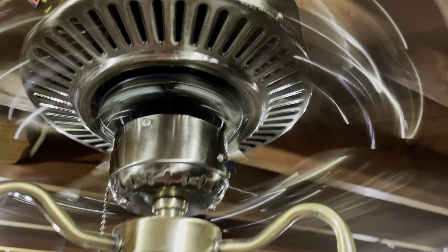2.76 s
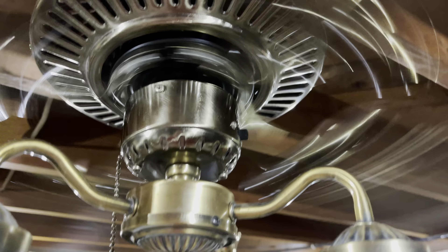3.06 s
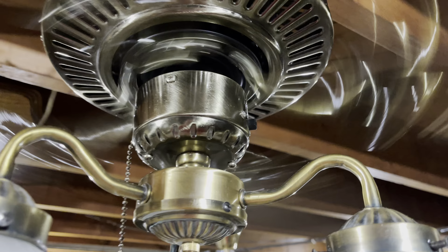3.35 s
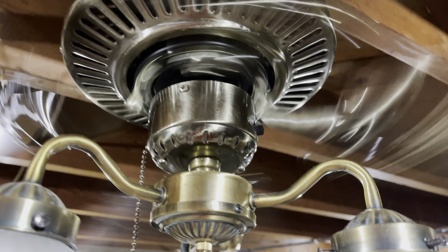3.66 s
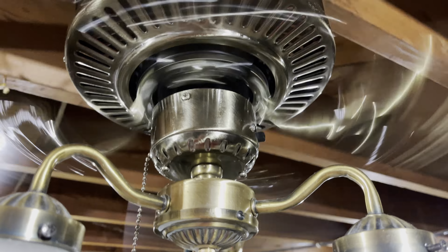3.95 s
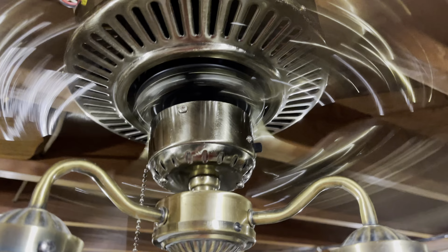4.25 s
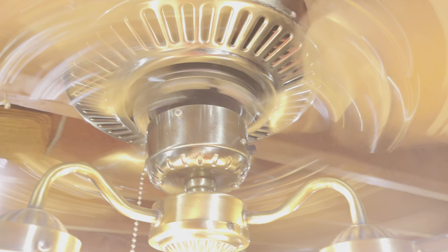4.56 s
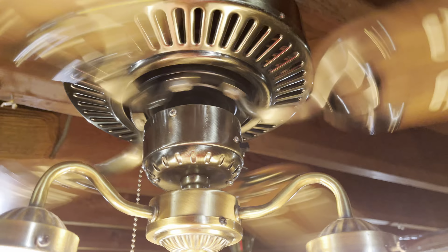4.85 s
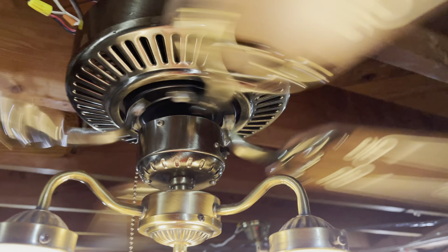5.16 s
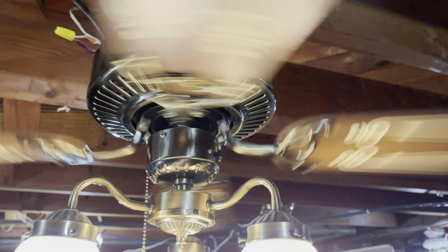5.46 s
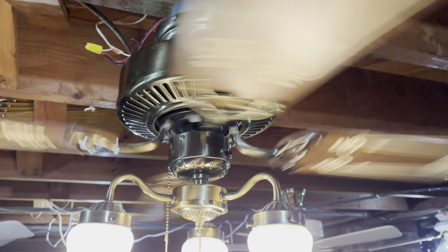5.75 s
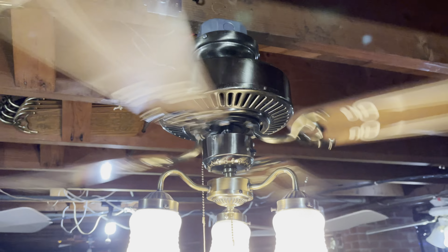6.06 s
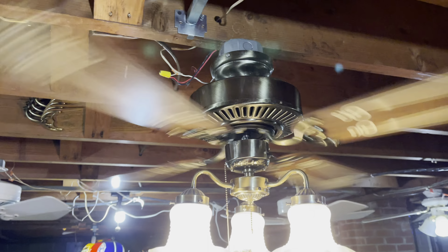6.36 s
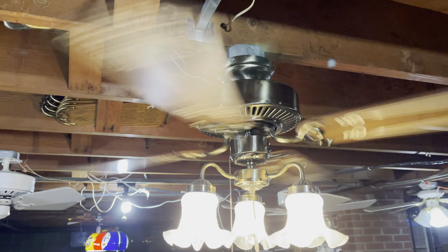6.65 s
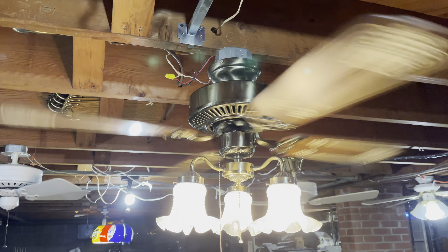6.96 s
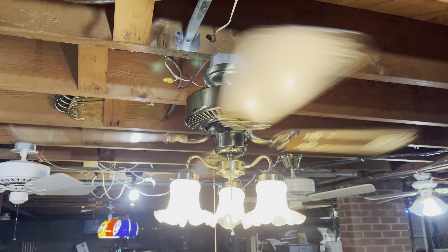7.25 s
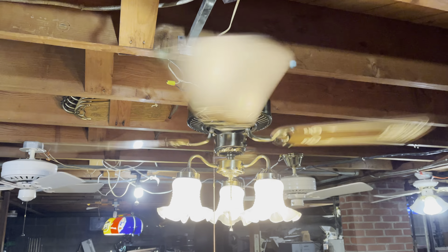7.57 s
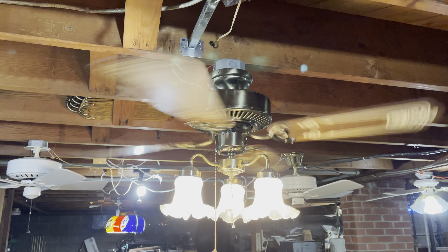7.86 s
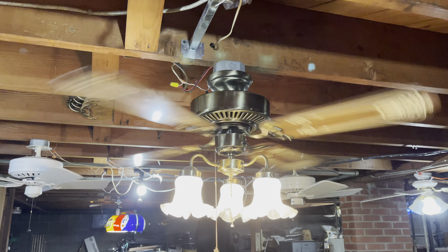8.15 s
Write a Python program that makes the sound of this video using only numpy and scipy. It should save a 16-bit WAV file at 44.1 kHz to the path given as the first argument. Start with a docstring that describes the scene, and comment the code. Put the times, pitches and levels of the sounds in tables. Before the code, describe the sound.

Two sharp metallic clicks of a light's pull chain sound over the steady rush, motor hum and gusts of a ceiling fan.

```python
"""The rush of a ceiling fan close overhead, under open joists: its blades stir the air, its motor hums and
buzzes thinly, its draught buffets the microphone. The bass drops out for a while after the big gusts.
Faint handling knocks, ticks and rustles pass, and the bead chain jingles once. The light's pull-chain
switch snaps twice, on the pull and on the release, ringing its metal housing. Then the microphone backs
away: the air grows softer and the throbbing hum stands out."""
import sys
import numpy as np
from scipy import signal
from scipy.fft import rfft, irfft, next_fast_len
from scipy.io import wavfile

SR = 44100
rng = np.random.default_rng(int(sys.argv[2]) if len(sys.argv) > 2 else 0)


def materialize(psi):
    """Save the field psi as 16-bit PCM at rate SR to the path in sys.argv[1].

    A 1-D psi becomes a single channel; in a 2-D psi each row is a channel.
    """
    bounded = np.clip(np.atleast_2d(psi).T, -1, 1)
    quanta = np.round(bounded * 32767).astype(np.int16)
    wavfile.write(sys.argv[1], SR, quanta)


N = 366471
TIME = np.arange(N) / SR
MAINS_HZ = 60

# Air off the blades along the microphone's path. Each row: time in seconds, rush in dB, hollow ring in dB.
BLADE_AIR = [(0.0, -49, -50.5), (0.62, -51, -47.5), (1.1, -48.5, -48), (1.45, -49, -50.5), (2.55, -48, -49),
             (3.8, -49, -52), (5.0, -48, -52), (5.3, -49.5, -46.5), (5.7, -49.5, -52.5),
             (6.05, -50.5, -51.5), (6.7, -51, -72), (7.0, -51.5, -59), (7.55, -53.5, -61.5),
             (8.31, -53, -57.5)]
# How alike left and right are in this room. Each row: frequency in Hz, correlation.
ROOM_LIKENESS = [(60, 0.9), (130, 0.35), (280, 0.28), (600, 0.25), (1300, 0.025), (3000, 0.01),
                 (12000, 0.13)]
# The bass drops out after gusts.
# Each row: start, end and return time in seconds, lower edge in Hz, loss of breeze in dB.
BASS_DROPS = [(1.318, 2.02, 0.77, 244, 16), (5.15, 5.287, 0.39, 170, 20), (5.364, 5.645, 0.29, 413, 19.5),
              (5.5, 6.255, 0.28, 262, 21)]


def from_db(db):
    """Decibels to gain."""
    return 10 ** (np.asarray(db) / 20)


def rms_one(x):
    """Scale to an rms of 1."""
    return x / np.sqrt(np.mean(x ** 2) + 1e-20)


def in_time(rows):
    """Each column of a curve at every sample."""
    s, *columns = np.transpose(rows)
    return [np.interp(TIME, s, column) for column in columns]


def at_hz(points, hz):
    """Read a table on a log-frequency axis."""
    known_hz, values = np.transpose(points)
    return np.interp(np.log(hz + 1), np.log(known_hz), values)


def panned(pan_db):
    """Left and right gains, with the left louder by pan_db."""
    return from_db(np.array([[.5], [-.5]]) * pan_db)


def drift(rate_hz):
    """A random wander with an rms of about 1, mostly slower than rate_hz."""
    size = 8192
    hz = np.fft.rfftfreq(size, N / SR / size)
    slow = rms_one(irfft(rfft(rng.standard_normal(size)) / (1 + (hz / rate_hz) ** 2) ** 2))
    return np.interp(np.linspace(0, size, N), np.arange(size), slow)


def noise(spectrum, likeness, size=N, peaks=(), rolloff_db=30):
    """Stereo noise of a given colour, resonances and left-right likeness; rms 1."""
    padded = next_fast_len(size, True)
    hz = np.fft.rfftfreq(padded, 1 / SR)
    octaves_over = np.log2(np.maximum(hz / spectrum[-1][0], 1))   # above the colour's last point
    bumps_db = sum(db * np.exp(-.5 * ((hz - centre) / width) ** 2) for centre, width, db in peaks)
    colour = from_db(at_hz(spectrum, hz) + bumps_db - rolloff_db * octaves_over)
    mid, side = rfft(rng.standard_normal((2, padded))) * colour
    alike = np.clip(at_hz(likeness, hz), -1, 1)
    ports = np.sqrt(1 + alike) * mid + np.sqrt(1 - alike) * side * [[1], [-1]]
    return rms_one(irfft(ports, padded)[:, :size])


def band_noise(low_hz, high_hz, size, order=2):
    """Stereo noise between two edges; rms 1."""
    band = signal.butter(order, [low_hz, min(high_hz, SR / 2 - 1)], "band", fs=SR, output="sos")
    return rms_one(signal.sosfilt(band, rng.standard_normal((2, size))))


def low_pass(x, top_hz, order=10):
    """Cut everything above an edge."""
    return signal.sosfilt(signal.butter(order, min(top_hz, SR / 2 - 1000), fs=SR, output="sos"), x + 1e-18)


def add(track, s, sound):
    """Mix a sound in from time s."""
    start = max(round(s * SR), 0)
    track[:, start:start + sound.shape[-1]] += sound[:, :N - start]


def blades(swish_db=1.0, hiss_db=-66.5, hiss_follows=1.6, hollow_hz=650):
    """Turbulence off the blades overhead: a whirring rush, a hollow ring and a thin hiss at the edges."""
    # Colours of the rush, the hiss and the air close under the motor bowl (when centred on hollow_hz).
    # Each row: frequency in Hz, relative level in dB.
    rush_colour = [(50, -14.5), (100, 9.5), (240, 0.5), (460, -1.5), (620, -7.5), (800, -5), (950, -1.5),
                   (1400, -10.5), (1750, -10.5), (2100, -14), (2700, -18.5), (5000, -52.5)]
    hiss_colour = [(1000, -10), (2200, -3.5), (2800, 3.5), (3750, 1), (4350, -0.5), (5400, -2.5),
                   (6400, -6), (7150, -8.5), (7900, -7.5), (9500, -12.5), (11200, -12.5), (12200, -23.5),
                   (13000, -34.5), (14000, -54)]
    hollow_colour = [(300, -14.5), (520, -4.5), (650, -2), (730, -6), (830, -6), (950, -18.5),
                     (1400, -19.5)]
    # Peaks and dips that housing and joists give the rush. Each row: centre and width in Hz, gain in dB.
    resonances = [(441.4, 23, 4), (554, 14, -2.5), (1086, 40, -3.5), (1259, 140, 4.5)]
    # The ring shifts as the microphone moves round the bowl. Each row: time in seconds, centre in Hz.
    hollow_pitch = [(0, 641.8), (2.2, 651.4), (4.5, 678.3), (5.3, 688.4), (5.75, 821), (6.2, 902.4),
                    (7.0, 743.8), (8.31, 717)]
    rush_db, hollow_db = in_time(BLADE_AIR)
    rush = from_db(rush_db) * noise(rush_colour, ROOM_LIKENESS, peaks=resonances)
    position = np.cumsum(in_time(hollow_pitch)[0] / hollow_hz)   # reading faster raises the ring
    still = noise(hollow_colour, ROOM_LIKENESS, size=int(position[-1]) + 2)
    shifting = np.array([np.interp(position, np.arange(len(port)), port) for port in still])
    hollow = from_db(hollow_db) * shifting
    hiss_gain = from_db(hiss_db + hiss_follows * (rush_db - rush_db.mean()))
    hiss = hiss_gain * noise(hiss_colour, ROOM_LIKENESS)
    return from_db(swish_db * drift(45)) * (patchy(rush + hollow) + hiss)


def patchy(x, depth_db=1.5, rate_hz=22):
    """Turbulence comes in patches: each band swells and sinks on its own."""
    padded = next_fast_len(N, True)
    octave = np.log2(np.maximum(np.fft.rfftfreq(padded, 1 / SR), 1))
    centres = np.log2([300, 480, 750, 1150, 1700, 2600])
    spectrum, out = rfft(x, padded), 0
    for share in np.eye(len(centres)):
        band = irfft(spectrum * np.interp(octave, centres, share), padded)[:, :N]
        out = out + from_db(depth_db * drift(rate_hz)) * band
    return out


def motor(waver_rad=.04, beat_hz=6.23, first_dip_s=.11, rotor_db=-13):
    """The windings hum at twice the mains; a weaker rotor tone just below makes the hum throb."""
    # The microphone moves through the room's standing waves. Each row: time in seconds, hum in dB.
    hum_level = [(0.0, -38), (0.8, -41), (2.5, -57), (3.8, -54.5), (4.3, -40), (5.4, -57.5), (6.45, -42),
                 (6.95, -37.5), (8.31, -37)]
    # Each row: multiple of the hum's pitch, relative level in dB.
    partials = [(0.5, -22.5), (1, -1), (2, -20), (4, -32)]
    hum_db, = in_time(hum_level)
    since_dip = TIME - first_dip_s
    phase = 2 * np.pi * 2 * MAINS_HZ * since_dip + waver_rad * drift(2.1)
    hum = sum(from_db(db) * np.sin(k * phase) for k, db in partials)
    rotor = from_db(rotor_db) * np.sin(phase - 2 * np.pi * beat_hz * since_dip)
    return np.sqrt(2) * from_db(hum_db) * (hum - rotor) * panned(-0.42)


def buzz(waver_db=4.5, waver_rad=0.47):
    """The motor's laminations buzz in thin lines locked to the mains, each wavering at either port."""
    # Each row: frequency in Hz, level in dB.
    lines = [(480, -71), (1080, -81), (1200, -80), (1320, -74.5), (1380, -77), (1440, -76), (1680, -77),
             (1860, -83.5), (2040, -81.5)]
    out = np.zeros((2, N))
    for port in out:
        for hz, db in lines:
            gain = from_db(db + waver_db * drift(1.9))
            phase = 2 * np.pi * MAINS_HZ * round(hz / MAINS_HZ) * TIME + rng.uniform(0, 2 * np.pi)
            port += gain * np.sin(phase + waver_rad * drift(4))
    return np.sqrt(2) * out


def buzz_comb(low_hz=1481, high_hz=2520, line_db=-85, waver_db=2):
    """The laminations chatter once a mains cycle: a comb of weak lines that fades with distance."""
    rush_db, _ = in_time(BLADE_AIR)
    cycle = TIME[:round(SR / MAINS_HZ)]
    multiples = range(round(low_hz / MAINS_HZ), round(high_hz / MAINS_HZ) + 1)
    chatter = sum(np.sin(2 * np.pi * k * MAINS_HZ * cycle + rng.uniform(0, 2 * np.pi, (2, 1)))
                  for k in multiples)
    gain = from_db(line_db + rush_db - rush_db.mean() + waver_db * drift(3))
    return np.sqrt(2) * gain * chatter[:, np.arange(N) % len(cycle)]


def far_whirr(centre_hz=1340, width_hz=290, waver_db=1.0, sizzle_db=-79):
    """A narrow, wavering whirr and a faint, steady sizzle fill the room, clearer away from the fan."""
    # The whirr along the microphone's path. Each row: time in seconds, level in dB.
    whirr_level = [(0, -69.5), (4.4, -63), (5.8, -77), (6.6, -80), (6.95, -69), (8.31, -63)]
    # Each pair: frequency in Hz, relative level in dB.
    sizzle_colour = [(5000, -24), (5700, -1), (6700, 0.5), (7050, -16.5), (7600, -0.5), (8400, -6),
                     (8800, -15.5), (11300, -10.5), (12500, -27)]
    whirr_db, = in_time(whirr_level)
    gain = from_db(whirr_db + waver_db * drift(8))
    whirr = gain * band_noise(centre_hz - width_hz / 2, centre_hz + width_hz / 2, N)
    return whirr + from_db(sizzle_db) * noise(sizzle_colour, ROOM_LIKENESS)


def draught(lumpy_db=4, calm_db=-50, gusty_db=-34, flutter_low_hz=55, tearing_db=-6, tearing_hz=430):
    """Moving air rumbles and flutters on the microphone: even when gentle, in tearing lumps when strong."""
    # The breeze over time; its low rumble stays thin after the last bass drop, then returns.
    # Each row: time in seconds, flutter in dB, rumble in dB.
    breeze = [(0.0, -43.5, -50.5), (2.3, -39.5, -52), (2.6, -39, -44), (3.3, -42, -55), (4.0, -40, -51),
              (4.5, -39.5, -49), (6.5, -51, -84.5), (6.85, -45, -68), (8.31, -45, -53.5)]
    # Each row: times in seconds of full rumble, full flutter and the gust's end, rumble in dB,
    # flutter in dB, build of the flutter in dB per second.
    gusts = [(0.95, 1.06, 1.264, -28, -32, 57), (4.616, 4.75, 4.795, -32.5, -44, 20),
             (5.08, 5.1, 5.1, -35.5, -36.5, 39.5)]
    # Each row: frequency in Hz, relative level in dB.
    rumble_colour = [(15, -23), (30, -8.5), (55, 8.5), (85, 5.5), (130, -2), (220, -25.5), (500, -63.5)]
    flutter_colour = [(70, -10), (140, 0), (230, 0.5), (330, -7), (500, -13), (800, -31), (1500, -58),
                      (3000, -69.5)]
    # How alike the draught is at the two ports. Each row: frequency in Hz, correlation.
    likeness = [(60, 0.05), (130, 0.35), (280, 0.93), (600, -0.6)]
    lull_db = sum(loss_db * drop_depth(start_s, end_s, return_s)
                  for start_s, end_s, return_s, _, loss_db in BASS_DROPS)
    flutter, rumble = from_db(-lull_db) * from_db(in_time(breeze))
    for rumble_s, flutter_s, end_s, rumble_db, flutter_db, flutter_db_per_s in gusts:
        rumble = np.hypot(rumble, gust(rumble_s, end_s, rumble_db, build_db_per_s=28))
        flutter = np.hypot(flutter, gust(flutter_s, end_s, flutter_db, flutter_db_per_s))
    gustiness = np.clip((20 * np.log10(rumble) - calm_db) / (gusty_db - calm_db), .2, 1)
    lumps = from_db(lumpy_db * gustiness * drift(46))
    low_cut = signal.butter(3, flutter_low_hz, "high", fs=SR, output="sos")
    flapping = signal.sosfilt(low_cut, noise(flutter_colour, likeness))
    tearing_band = band_noise(tearing_hz / np.sqrt(2), tearing_hz * np.sqrt(2), N, order=3)
    tearing = from_db(tearing_db) * flutter / flutter.max() * tearing_band
    wind = rumble * noise(rumble_colour, likeness) + flutter * (flapping + tearing)
    return lumps * wind * panned(0.6 * gustiness)


def gust(full_s, end_s, db, build_db_per_s, collapse_db_per_s=95):
    """Gain of a gust that builds steadily, holds and collapses fast."""
    building_db = build_db_per_s * np.maximum(full_s - TIME, 0)
    collapsing_db = collapse_db_per_s * np.maximum(TIME - end_s, 0)
    return from_db(db - building_db - collapsing_db)


def knocks(start_hz=3150, end_hz=520, fall_s=0.00181, chirp_t60=0.028, crack_db=10, crack_t60=0.0026):
    """Knocks on the microphone's case: a crack, and a chirp that falls as slower bending waves arrive."""
    # Each row: start in seconds, relative level in dB, top edge in Hz.
    bumps = [(0.2575, -33.5, 6500), (0.288, -32, 1500), (6.5382, -30.5, 9650)]
    out, t = np.zeros((2, N)), TIME[:SR // 10]
    hz = end_hz + (start_hz - end_hz) * np.exp(-t / fall_s)
    chirp = np.sin(2 * np.pi * np.cumsum(hz) / SR) * from_db(-60 * t / chirp_t60) / 2
    for s, db, top_hz in bumps:
        crack = from_db(crack_db - 60 * t / crack_t60) * band_noise(1800, 3700, len(t)) / 2
        add(out, s, from_db(db) * low_pass(crack + chirp, top_hz, order=4))
    return out


def eddies(slowing=0.22, mismatch_rad=0.77, churn_db=-4, churn_span=1.263, shared=0.3, breakup_hz=300):
    """Each eddy thuds on the microphone and slows as it passes; small, fast ones break up into churn."""
    # Each row: time of the peak in seconds, level in dB, pitch in Hz, half length in cycles,
    # left over right in dB.
    strongest = [(0.737, -25, 69.3, 1, 11), (0.906, -22.5, 138.3, 1.6, 3), (0.98, -12, 64.1, 1.26, 2.5),
                 (1.043, -20.5, 150.4, 1.6, 1), (1.058, -10, 81, 0.35, 4), (1.065, -21, 330, 0.86, 5),
                 (1.094, -16, 162.4, 1.35, 4), (1.111, -19, 170.6, 0.87, 3), (1.154, -20.5, 410, 1.5, 3),
                 (1.169, -11.5, 141.4, 0.6, 7), (1.208, -24, 548, 1.3, 0), (1.218, -15.5, 152.2, 0.58, -1),
                 (1.2245, -15.5, 490, 0.8, 2), (1.229, -9.5, 226.8, 0.53, 1), (1.255, -25, 218.7, 0.85, 3),
                 (1.283, -24.5, 380, 1.54, 10), (1.294, -27.5, 171.3, 3.8, -1), (1.339, -28, 612, 1.9, 4),
                 (1.342, -26.5, 340, 2.2, 5.5), (1.778, -44, 340, 1.7, 1), (1.845, -41, 400, 2.7, -1),
                 (2.268, -43, 290, 2, 2), (2.39, -36.5, 239, 4.1, 0), (2.469, -34, 223, 6.5, -2),
                 (2.689, -33, 119.6, 2, 1), (2.891, -37, 107.4, 0.83, 0), (2.969, -35, 257, 1.5, 5),
                 (4.627, -11, 83.1, 0.3, 3), (4.633, -28.5, 299, 2.2, -1), (4.744, -17, 122, 0.37, 3),
                 (4.96, -29, 261.4, 4.2, 3), (5.081, -26.5, 230.5, 1.8, 1), (5.119, -14.5, 288, 1.3, 5),
                 (5.13, -22, 140.1, 1.3, 0), (5.197, -33, 330.6, 2.3, 0), (5.285, -31.5, 350, 4, 2),
                 (5.326, -34, 380, 3.5, 8), (5.372, -25, 510, 0.94, 10), (5.384, -33, 480, 1.2, 5),
                 (5.395, -37, 95.3, 0.85, 5), (5.433, -33.5, 578, 3.5, 4), (5.45, -49, 95.5, 0.76, -3),
                 (5.485, -34.5, 500, 2.4, 8), (5.514, -48, 78, 0.61, 0), (5.726, -44, 320, 4.9, 0),
                 (5.819, -47, 480, 3, 0)]
    out, t = np.zeros((2, N)), TIME[:SR // 4] - 1 / 8
    for s, db, hz, half_cycles, pan_db in strongest:
        half_s = half_cycles / hz
        swell = 1 / np.cosh(t / half_s)
        cycles = np.cumsum(hz * (1 - slowing * np.tanh(t / half_s))) / SR
        phase = 2 * np.pi * cycles + rng.uniform(0, 2 * np.pi)
        thud = np.sin(phase + mismatch_rad * np.array([[1], [-1]]))
        own = band_noise(hz / churn_span, hz * churn_span, len(t))
        common = band_noise(hz / churn_span, hz * churn_span, len(t))[0]   # the same at both ports
        churn = from_db(churn_db) * (np.sqrt(1 - shared) * own + np.sqrt(shared) * common)
        broken = hz ** 2 / (hz ** 2 + breakup_hz ** 2)
        eddy = np.sqrt(1 - broken) * thud + np.sqrt(broken) * churn
        add(out, s + t[0], from_db(db) * panned(pan_db) * swell * eddy)
    return low_pass(out, top_hz=1400, order=3)


def drop_depth(start_s, end_s, return_s, onset_s=0.048):
    """Depth of a bass drop, 0-1: quick onset, hold, slower return."""
    return np.clip(np.minimum((TIME - start_s) / onset_s, 1 - (TIME - end_s) / return_s), 0, 1)


def thin_bass(x, order=11.3):
    """In each bass drop, everything under a rising lower edge falls away steeply."""
    hz, s, frames = signal.stft(x, SR, nperseg=1024, noverlap=768)
    edges = [edge_hz * drop_depth(start_s, end_s, return_s)
             for start_s, end_s, return_s, edge_hz, _ in BASS_DROPS]
    edge_hz = np.interp(s, TIME, np.max(edges, axis=0))
    gain = 1 / np.sqrt(1 + (edge_hz / np.maximum(hz, 20)[:, None]) ** (2 * order))
    return signal.istft(frames * gain, SR, nperseg=1024, noverlap=768)[1][:, :N]


def handling(tick_t60=0.007, tick_span=1.53, rustle_top_hz=10000, grain_db=2.0):
    """Fingers shift on the microphone's case: tiny ticks and soft rubs."""
    # Each row: start in seconds, level in dB, lower edge in Hz.
    ticks = [(1.3893, -48, 5600), (2.049, -55, 7000), (3.222, -47, 6100), (4.3956, -42, 2970),
             (4.3956, -51, 6470), (5.3448, -40, 1940), (5.3432, -46, 7500), (5.736, -49, 5500),
             (6.0677, -55, 7000), (6.5876, -42.5, 7500), (6.5882, -41, 2090), (7.402, -45.5, 2800),
             (7.4036, -51, 6500)]
    # Each row: middle in seconds, level in dB, half length in seconds, lower edge in Hz.
    rustles = [(3.359, -66, 0.059, 5000), (5.76, -68.5, 0.018, 6500), (6.212, -66.5, 0.04, 3990),
               (6.675, -66.5, 0.074, 7500), (6.69, -62, 0.061, 1386)]
    out, t = np.zeros((2, N)), TIME[:SR // 2]
    for s, db, low_hz in ticks:
        body = band_noise(low_hz, low_hz * tick_span, len(t))
        sheen = from_db(-27.0) * band_noise(low_hz, 13000, len(t))
        add(out, s, from_db(db - 60 * t / tick_t60) * (body + sheen))
    for s, db, half_s, low_hz in rustles:
        swell = np.exp(-.5 * ((t - t.mean()) / half_s) ** 2)
        grain = from_db(grain_db * drift(150)[:len(t)])
        add(out, s - t.mean(), from_db(db) * swell * grain * band_noise(low_hz, rustle_top_hz, len(t)))
    return low_pass(out, top_hz=11500)


def chain(peak_s=3.347, half_s=0.021, half_width_hz=75):
    """The chain's beads brush the housing once, and a few narrow resonances shimmer."""
    # Each row: centre in Hz, level in dB.
    jingle = [(3833, -62), (4312, -67), (7327, -67), (7881, -65), (9800, -69), (9960, -61), (10850, -79)]
    out, t = np.zeros((2, N)), TIME[:SR // 2] - 1 / 4
    shimmer = sum(from_db(db) * band_noise(hz - half_width_hz, hz + half_width_hz, len(t))
                  for hz, db in jingle)
    add(out, peak_s + t[0], shimmer * np.exp(-.5 * (t / half_s) ** 2))
    return out


def switch(snap_t60=.019, ring_db=-1, grind_s=0.00023, uneven_db=2):
    """The sprung ratchet creeps, snaps over and bounces; each contact cracks and rings the housing."""
    # Each row: start in seconds, level in dB, stroke (0 pull, 1 release), top edge in Hz.
    contacts = [(4.5507, -39.5, 0, 12000), (4.5553, -12.5, 0, 16500), (4.5581, -16, 0, 12400),
                (4.5622, -32.5, 0, 12640), (4.57, -25.5, 0, 11900), (4.772, -47, 1, 9000),
                (4.777, -40, 1, 9500), (4.791, -38, 1, 9000), (4.7961, -11, 1, 13700),
                (4.7993, -16, 1, 11900), (4.81, -28.5, 1, 11950), (4.8527, -33, 1, 13100)]
    # The snap on each stroke. Each row: frequency in Hz, relative level in dB.
    pull_colour = [(530, -31), (900, -11.5), (1110, -13), (1600, -14), (2150, -19.5), (2890, -2.5),
                   (3400, -8), (4300, 2.5), (4740, -1), (5450, 2.5), (6300, -5.5), (7000, -11.5),
                   (9400, 1.5), (10200, -10.5), (11600, -2.5), (12700, -18), (13500, -20.5), (14600, -31),
                   (15400, -25), (16500, -44.5)]
    release_colour = [(530, -36), (820, -25), (960, -10), (1150, -10), (1460, -11), (1950, -27),
                      (2470, -0.5), (3050, -4.5), (3700, -9), (4150, 0.5), (4700, -7), (5300, -13),
                      (6100, -16.5), (7000, -17.5), (7860, -7), (8700, -13), (10400, -16), (11800, -14),
                      (13400, -36.5), (14300, -58)]
    # Modes of the metal housing. Each row: frequency in Hz, seconds to fall 60 dB,
    # relative level in dB on the pull and on the release.
    modes = [(954, 0.17, -32.5, -20), (1038, 0.22, -27.5, -23), (1230, 0.17, -40.5, -31),
             (1427, 0.22, -36.5, -28), (1817, .15, -40, -36), (2078, .29, -50, -42.5),
             (2510, 0.27, -46, -27), (2450, .26, -45, -42.5), (2640, 0.33, -50.5, -39),
             (2670, 0.31, -48.5, -37), (2950, 0.244, -39, -48), (2940, .26, -46.5, -42),
             (3500, .15, -35, -37), (4280, 0.23, -38, -42), (4190, .24, -38.5, -32), (4570, 0.18, -32, -34),
             (4870, 0.2, -34.5, -43), (4900, .17, -30.5, -46.5), (5510, 0.22, -32.5, -44),
             (6401, 0.32, -42.5, -36), (7340, .2, -34, -45), (8400, .2, -40, -28), (8340, .16, -35, -39),
             (8700, .14, -40, -44), (9400, 0.11, -34.5, -40), (10600, .17, -37, -33),
             (11920, .12, -31, -38.5)]
    out, t = np.zeros((2, N)), TIME[:SR // 3]
    for s, db, released, top_hz in contacts:
        colour = release_colour if released else pull_colour
        snap = noise(colour, ROOM_LIKENESS, size=len(t)) * from_db(-60 * t / snap_t60)
        phases = rng.uniform(0, 2 * np.pi, (len(modes), 2, 1))
        strengths = from_db(ring_db + rng.normal(0, uneven_db, len(modes)))
        ring = 0
        for (hz, t60, pull_db, release_db), phase, strength in zip(modes, phases, strengths):
            decay = from_db((release_db if released else pull_db) - 60 * t / t60)
            ring = ring + strength * decay * np.sin(2 * np.pi * hz * t + phase)
        bite = 1 - np.exp(-t / grind_s)   # the pawl slides home over a fraction of a millisecond
        add(out, s, from_db(db) * low_pass(bite * (snap + ring), top_hz, order=16))
    return out


def room(x, t60=0.23, first_echo_s=0.0049, top_hz=12400):
    """Joists and walls return a dense, short tail, different at each side and without the top treble."""
    t = TIME[:SR // 2]
    tail = rng.standard_normal((2, len(t))) * from_db(-60 * t / t60) * (t > first_echo_s)
    tail = low_pass(rms_one(tail), top_hz, order=20)
    return signal.fftconvolve(x, tail / np.sqrt(len(t)), axes=1)[:, :N]


def at_ports(x, image):
    """Set a sound's width and balance at the microphone's two ports, frequency by frequency."""
    padded = next_fast_len(N, True)
    hz = np.fft.rfftfreq(padded, 1 / SR)
    known_hz, likeness, balance_db = np.transpose(image)
    alike = np.clip(np.interp(hz, known_hz, likeness), -1, 1)
    pan_db = np.interp(hz, known_hz, balance_db)
    left, right = rfft(x, padded)
    mid = np.sqrt(1 + alike) * (left + right) / 2
    side = np.sqrt(1 - alike) * (left - right) / 2
    return irfft((mid + side * [[1], [-1]]) * panned(pan_db), padded)[:, :N]


def scene(room_db=-12):
    """Fan, chain and switch reach the microphone through the air; handling comes through its case."""
    # The stereo image of airborne sound is narrow in some treble bands and wide in others. The switch
    # sits off to one side, its mid treble louder on the left and out of step at the ports.
    # Each row: frequency in Hz, left-right likeness, left over right in dB.
    air_image = [(1800, -0.017, -0.5), (3000, -0.26, 1), (4160, 0.31, 2), (5250, -0.3, 4), (6310, 0.28, 2),
                 (7140, -0.13, 0.5), (7960, 0.23, -3.5), (9500, -0.044, 3), (10160, -1.1, -1),
                 (11330, -0.23, -1), (11800, 0.73, 3.5), (13000, -.2, -2.5)]
    switch_image = [(995, 0, -1), (2800, -0.8, 7.5), (4240, -0.47, 5), (5470, -0.26, 2), (7920, 0.52, -5.5),
                    (10200, -.5, 0.5), (11700, -0.052, 3)]
    clicks = switch()
    fan = thin_bass(blades() + motor() + draught()) + eddies() + buzz() + buzz_comb() + far_whirr()
    around = fan + chain() + from_db(room_db) * room(clicks)
    return at_ports(around, air_image) + at_ports(clicks, switch_image) + handling() + knocks()


def record(dry, cutoff_hz=16800):
    """The highest treble is cut off steeply."""
    return signal.sosfilt(signal.ellip(10, .3, 80, cutoff_hz, fs=SR, output="sos"), dry)


dry = scene()
out = record(dry)
materialize(out)
```